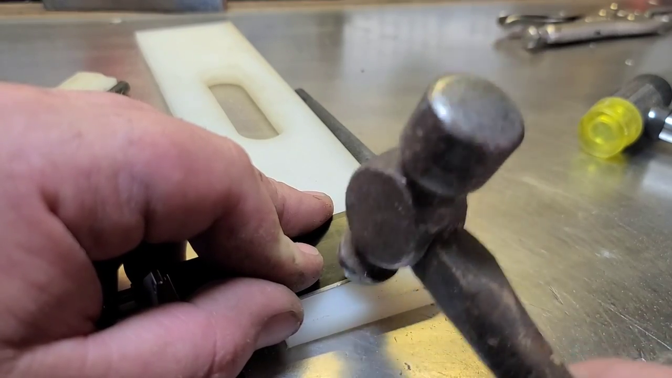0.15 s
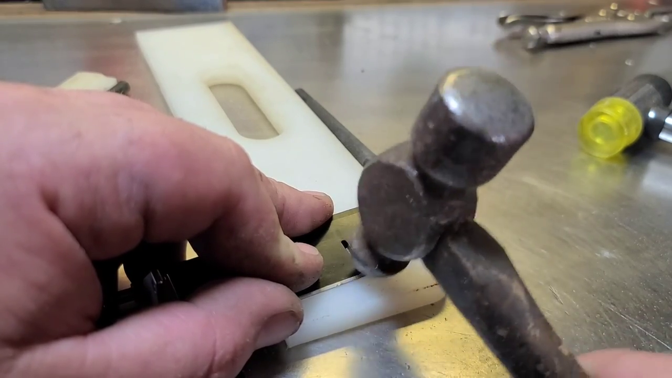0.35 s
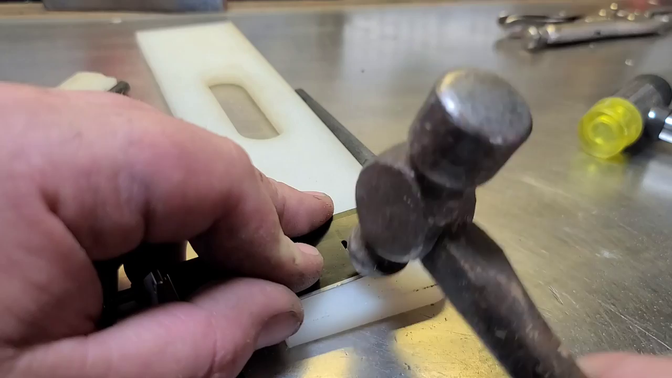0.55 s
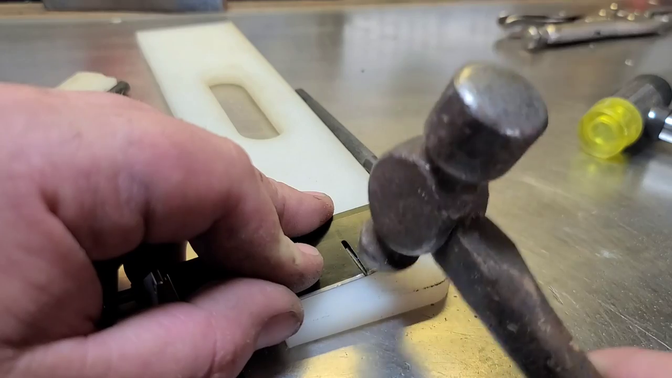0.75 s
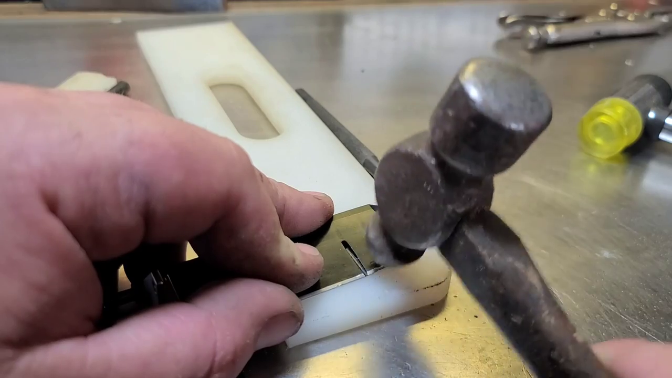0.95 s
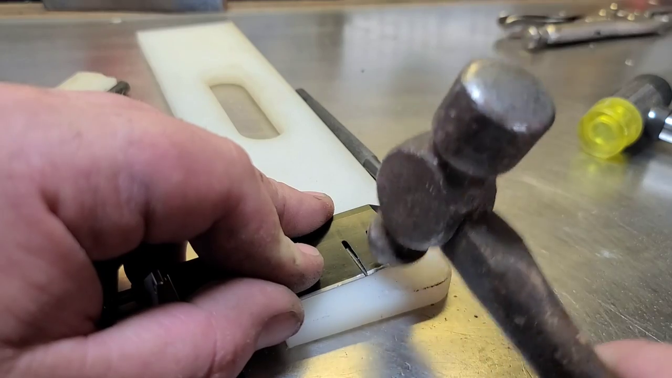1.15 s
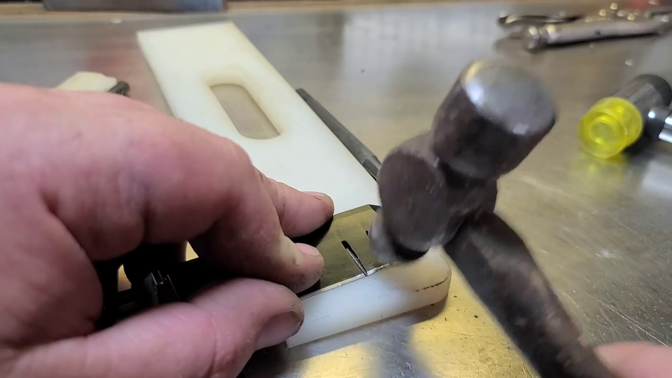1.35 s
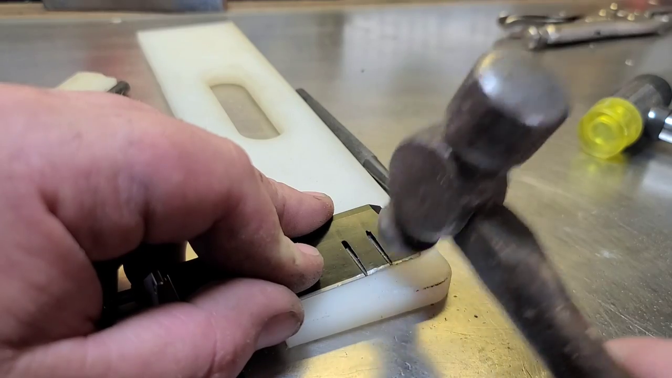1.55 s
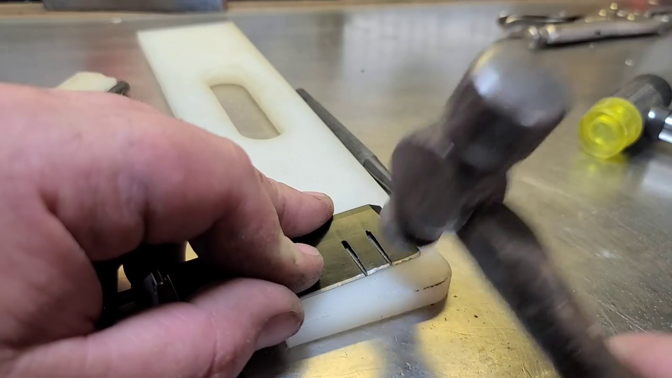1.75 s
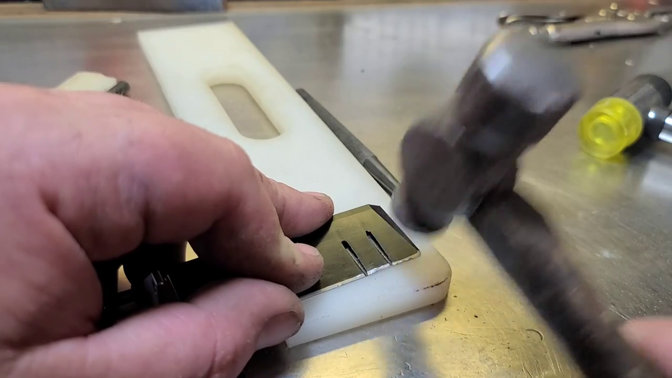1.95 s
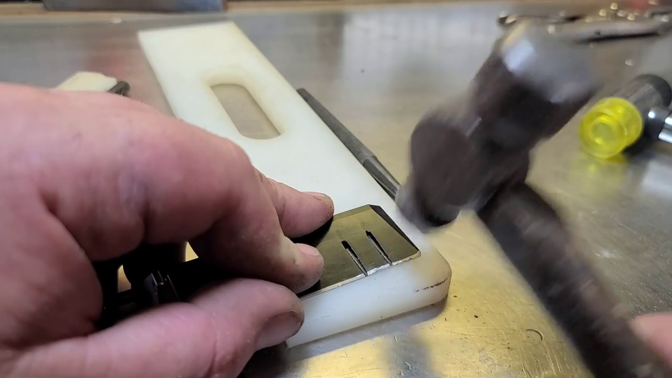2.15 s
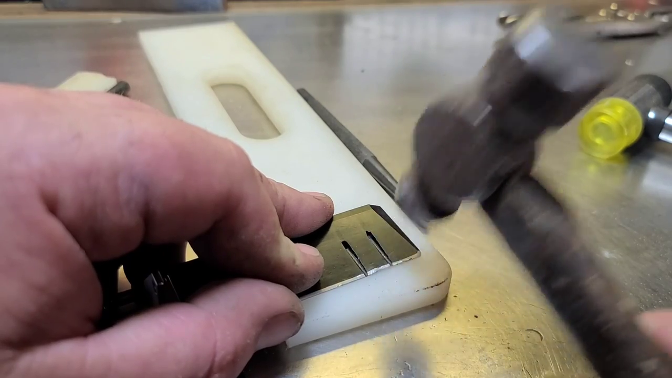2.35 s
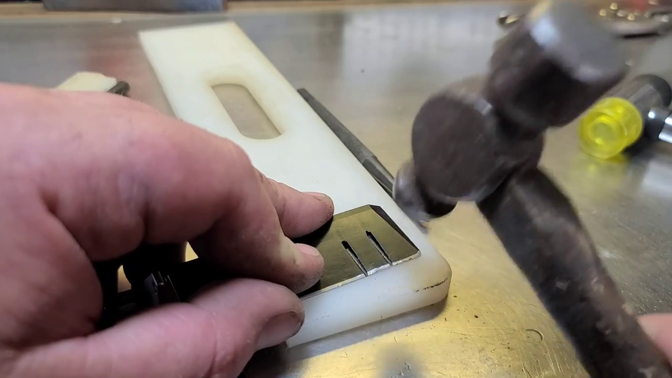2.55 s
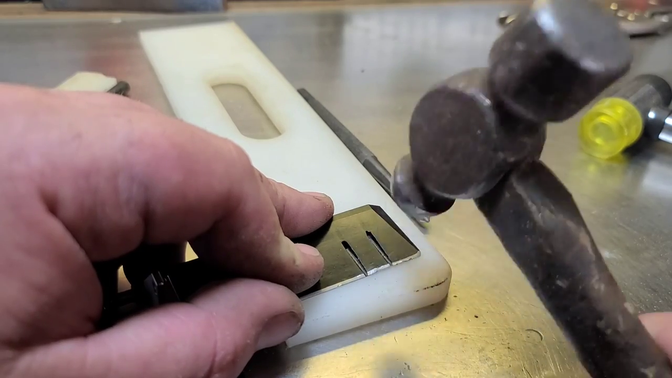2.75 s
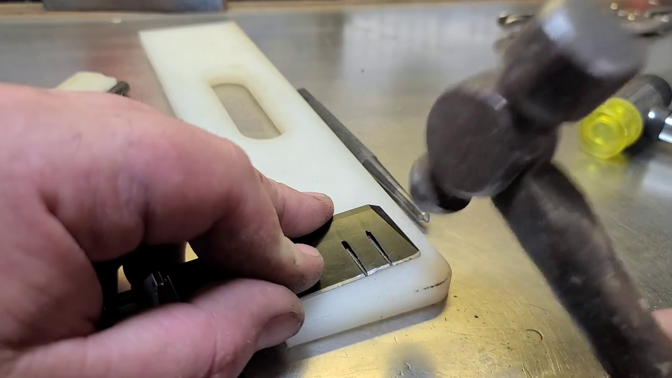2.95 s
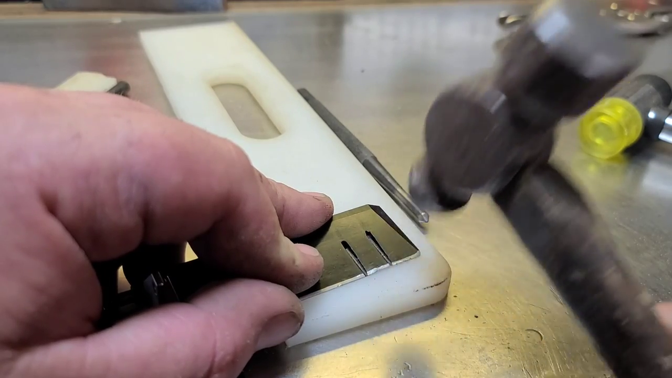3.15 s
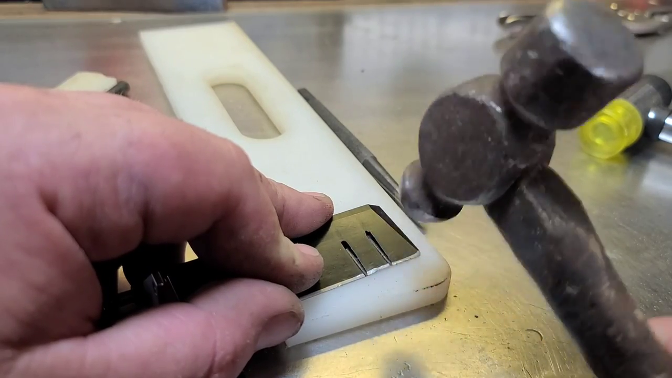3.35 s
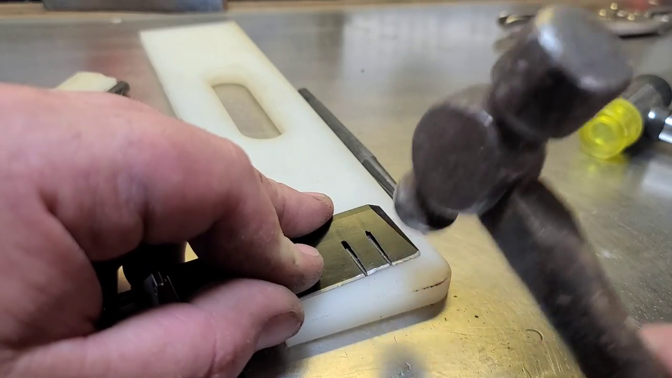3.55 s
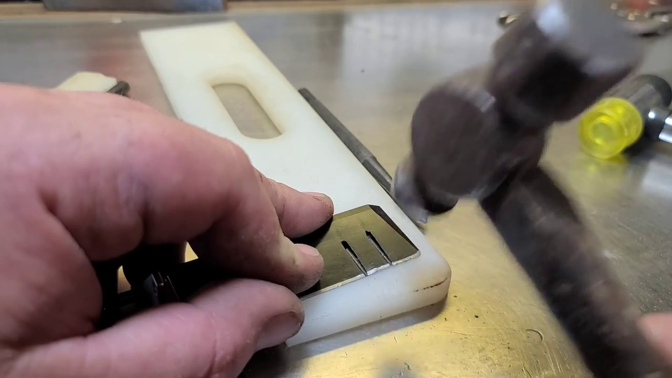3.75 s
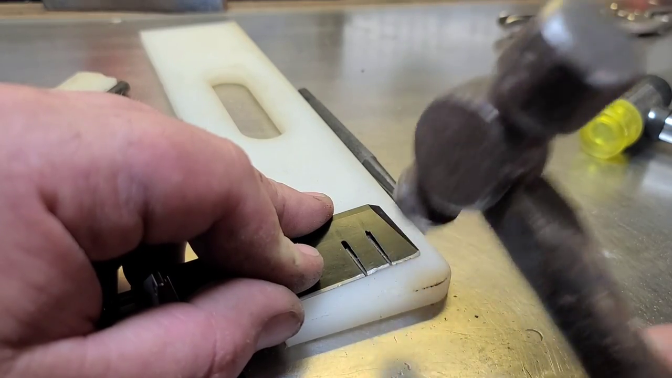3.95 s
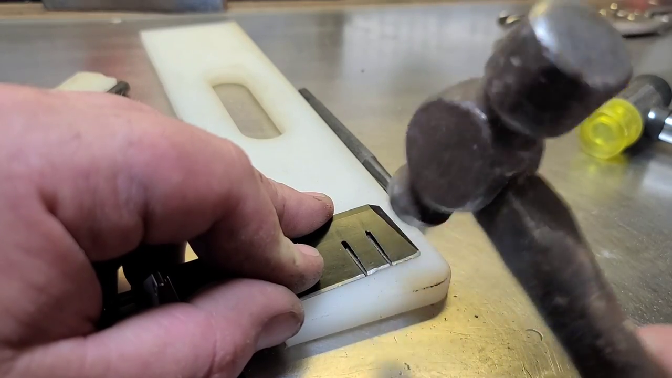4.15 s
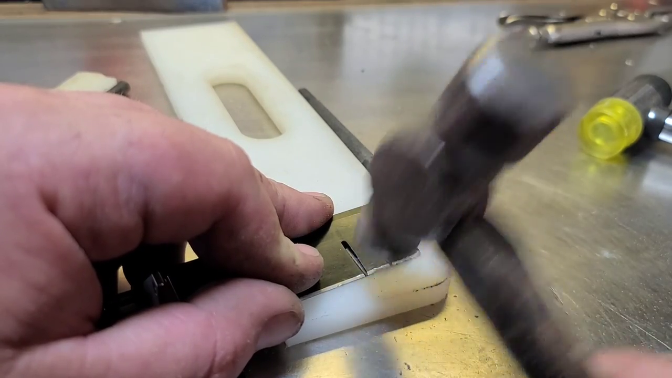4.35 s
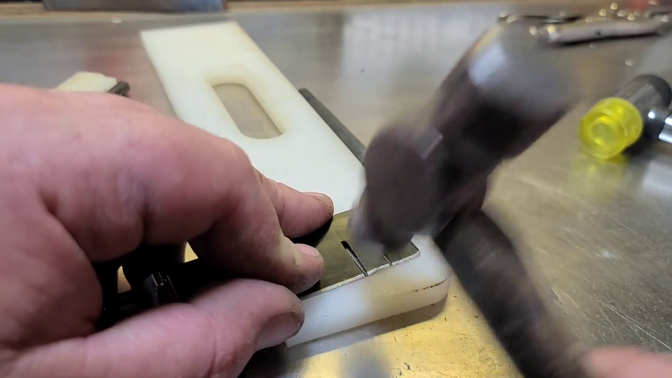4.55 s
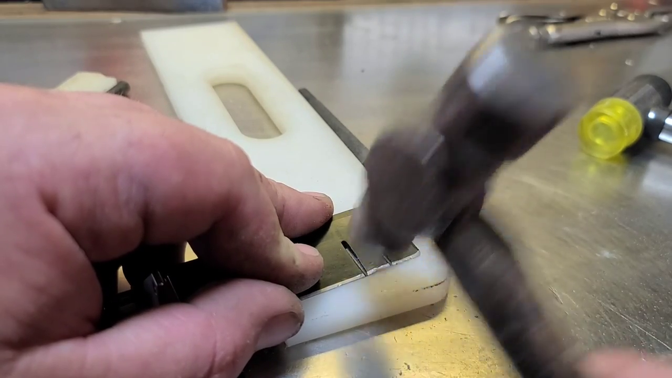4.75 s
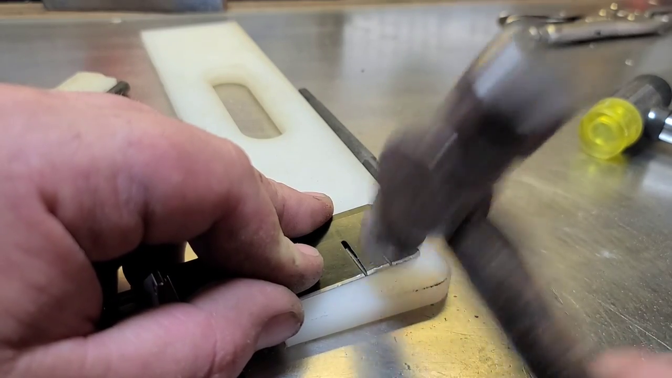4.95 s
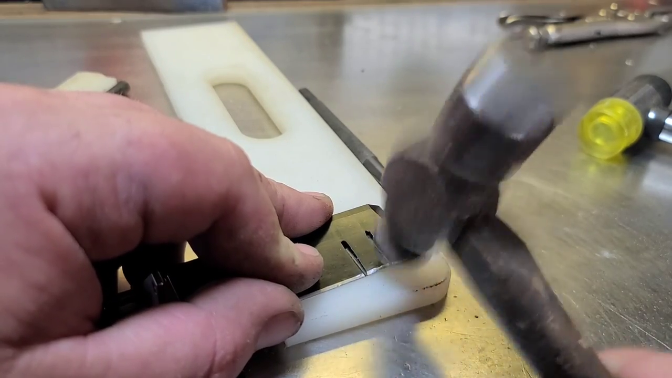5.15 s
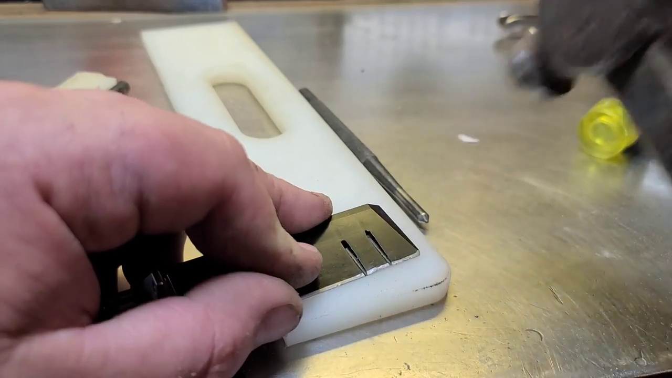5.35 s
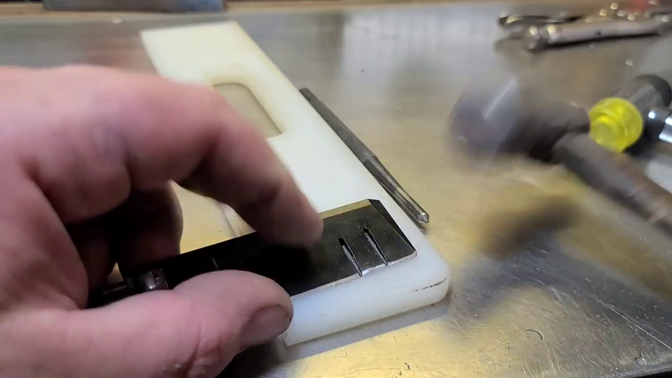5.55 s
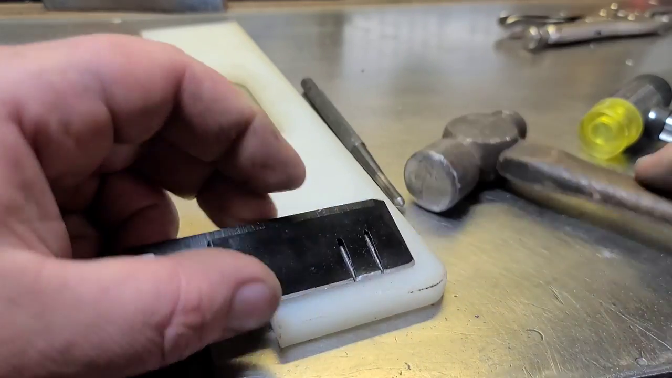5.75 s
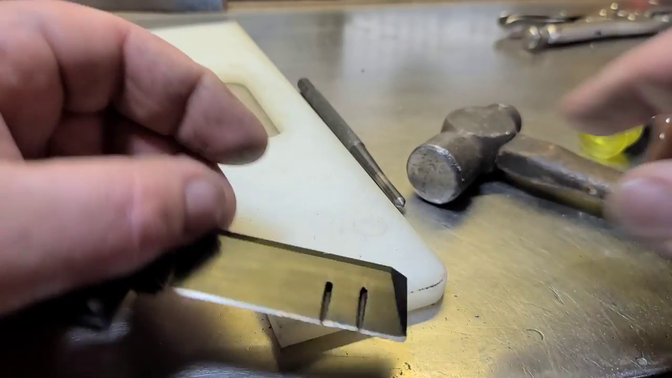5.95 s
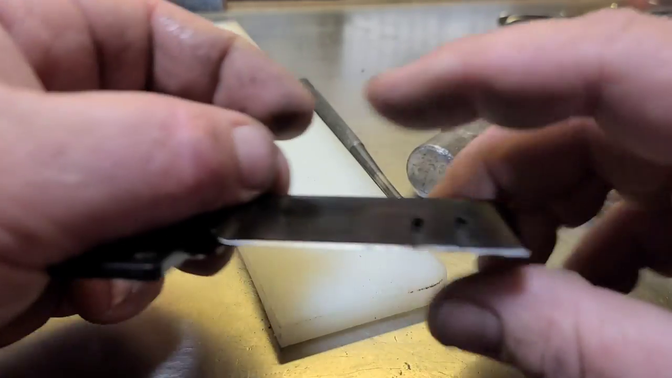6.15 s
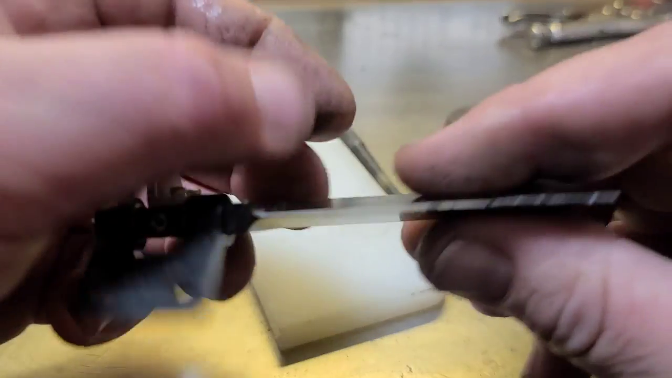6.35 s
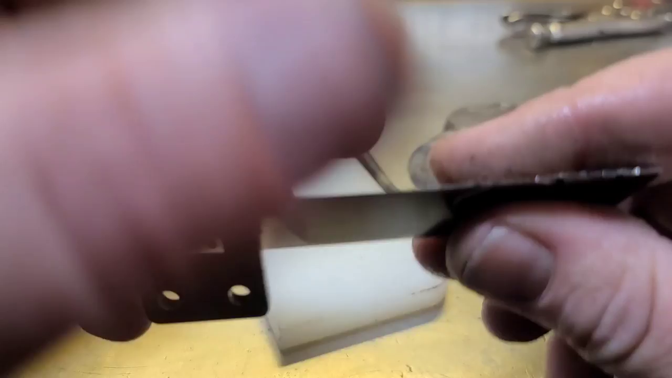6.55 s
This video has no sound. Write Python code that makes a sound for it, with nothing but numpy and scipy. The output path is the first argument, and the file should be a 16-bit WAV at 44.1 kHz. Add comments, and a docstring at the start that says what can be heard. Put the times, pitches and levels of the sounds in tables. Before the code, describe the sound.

From the very start, a small hammer taps a flat steel part held on a plastic cutting board, about five strikes a second, even in pace and strength. Each tap is a sharp metallic crack with a short buzz, while the board bounces on a metal-topped bench that thumps and rattles. The taps turn slightly duller around 3 to 4 seconds, brighten again, and stop at about 5.3 seconds. The part ticks faintly in the fingers at 5.5 seconds. Between 5.7 and 5.8 seconds the hammer head meets the bench with three quick clanks and a thin, brief ring, and the handle drops with a rocking knock just before 6 seconds. At 6.5 seconds the lifted part gives a light click. The microphone is close, in a small workshop with short reverberation, a quiet low rumble and a faint hiss that swells at the end.

```python
"""Hammer taps, about five a second, on a flat steel part held on a plastic cutting board.
Each tap cracks and buzzes; the board bounces on a metal-topped bench, which thumps and rattles.
The part clicks in the fingers and the small hammer is laid down: its head clanks and rings, its handle
drops. The part clicks again as it is lifted. A close phone in a small workshop, over low rumble and
a faint hiss that swells at the end."""
import sys
import numpy as np
from scipy import signal
from scipy.fft import rfft, irfft
from scipy.io import wavfile
from scipy.ndimage import uniform_filter1d

SR = 44100
rng = np.random.default_rng(int(sys.argv[2]) if len(sys.argv) > 2 else 0)


def transcribe(signal):
    """Save signal, clipped to [-1, 1], as a 16-bit WAV file at the path in sys.argv[1]."""
    frames = np.atleast_2d(signal).T
    limited = np.clip(frames, -1, 1)
    pcm = np.round(limited * 32767).astype(np.int16)
    wavfile.write(sys.argv[1], SR, pcm)


N = 290619
FFT_SIZE = 32768
TIME_S, FREQ_HZ = np.arange(FFT_SIZE) / SR, np.arange(FFT_SIZE // 2 + 1) * SR / FFT_SIZE

# hammer taps: (time [s], strength [dB], treble tick as the hammer's rim catches the part [dB])
TAPS = [(-0.003, -2.5, -1), (0.197, -0.8, 3), (0.4034, -0.3, 0.5), (0.5951, -0.7, 0), (0.7906, -0.8, 2.5),
        (0.991, -1.5, 3), (1.1869, -0.7, 1.5), (1.381, -1.4, 3), (1.5764, -1.9, 1.5), (1.7659, -1.8, 1.5),
        (1.9599, -1, 1), (2.1582, -0.3, 0), (2.3495, -0.1, 1.5), (2.5458, -0.5, -0.5), (2.7329, -0.8, -1),
        (2.9245, -0.6, 1), (3.116, -0.5, -7), (3.3099, 0, 1), (3.5037, 0.05, 0), (3.6971, -1.1, 0),
        (3.897, -0.8, -0.5), (4.0993, -0.9, 2.5), (4.2913, -1.4, 3), (4.4783, -2.5, 3.5), (4.666, -0.4, 0),
        (4.8639, 0.15, -1), (5.0595, 0, -1), (5.2492, -0.5, 0)]
# board and bench modes: (frequency [Hz], peak [dB], t60 [s], left minus right [dB])
BENCH_MODES = [(71.5, 32.5, 0.42, -1.5), (87.8, 28, 0.29, 2), (133.6, 22.5, 0.098, 8), (143.4, 21, 0.14, 3),
               (210.1, 29.5, 0.32, 0.5), (241.2, 29, 0.082, -3), (300.6, 34.5, .13, -3),
               (324.3, 33, 0.057, -0.5), (382.8, 32, 0.053, -1), (440.3, 32, 0.072, 5),
               (460.2, 33, 0.13, 6), (529.3, 26.5, 0.09, -7.5), (576.4, 20, 0.052, -7), (605, 14, 0.1, 17),
               (690, 18, 0.19, 7), (747.6, 22.5, 0.11, 1), (779.5, 19, 0.12, -4), (924, 19.5, 0.074, -17.5),
               (971.5, 20, 0.049, 7), (1057, 18.5, 0.025, -14), (1184, 20.5, 0.055, -9),
               (1224, 7.5, 0.069, -23), (1547.5, 20.5, 0.08, -12)]
# board slapping the bench: (frequency [Hz], peak [dB], t60 [s], left minus right [dB])
SLAP_MODES = [(325, 18, 0.011, 1), (686, 12, 0.0063, -2)]
# hand-damped steel part: (frequency [Hz], peak [dB], t60 [s], left minus right [dB])
PART_MODES = [(2264, 18, 0.07, 9), (2711, 18, 0.043, -9.5), (2889, 20, 0.055, -5), (3287, 16, 0.05, -0.5),
              (3740, 17, 0.04, 4.5), (4015, 14, 0.04, -8), (4980, 18, 0.025, -3), (8030, 11, 0.035, -1.5),
              (8970, 13, 0.03, -3), (9210, 9, 0.02, 5.5)]
# steel on steel at each microphone: (frequency [Hz], left [dB], right [dB])
STEEL_EQ = [(302, 7, 15.5), (660, 9.5, 19.5), (1180, 20.5, -1.5), (1660, 2, 12.5), (2570, 9, 7),
            (2700, 10.5, 17), (4200, -5, 14.5), (4664, 18.5, 16), (5510, 10.5, -6), (7100, 9.5, 9.5),
            (8100, -7, 15), (9510, 15, 11.5), (13700, 11, 8), (15500, 7, -15)]
# bench top's dense upper modes and loose things on it: (frequency [Hz], level [dB])
RATTLE_EQ = [(200, 2.5), (500, 16), (1100, 20), (1800, 13.5), (3000, 16), (4500, 8.5), (8000, 4.5),
             (15000, 0.5)]
# seating of the part: (time [s], firmness [0 usual, below: hollow bright clack, above: dull knock])
FIRMNESS = [(0.2, -0.61), (1.4, 0.42), (1.96, 1.3), (2.73, 0.54), (2.93, 2.3), (3.12, 2.7), (3.31, 1.7),
            (3.7, 2.14), (4.48, 1), (4.66, -1.33), (5.25, 0.81)]
# tap colour at firmness 1: (frequency [Hz], gain [dB])
FIRM_EQ = [(350, 0.35), (1000, 1), (3500, -1.4), (11000, -0.45)]
# workshop reverberation: (frequency [Hz], level re direct sound [dB])
ROOM_EQ = [(60, 1), (300, -14.5), (1000, -16.5), (3000, -14), (6000, -12), (10000, -10.5), (15000, -25)]
# background noise: (frequency [Hz], relative density [dB])
BACKGROUND_EQ = [(15, -35), (25, -5), (59, 1), (178, -15), (340, -9), (631, -25), (919, -24), (1020, -29),
                 (2360, -30), (7700, -39), (10400, -33), (15500, -41)]
# part in the fingers: (time [s], level [dB], tilt [dB/octave], t60 [s])
CLICKS = [(5.4588, -27, -9, 0.012), (6.5458, -14, -2.5, 0.029)]
# click spectrum: (frequency [Hz], level [dB])
CLICK_EQ = [(300, -29), (1500, -31.5), (2500, 3), (6000, 11), (9500, 14.5), (15500, 5.5)]
# head on the bench: (time [s], level [dB], tilt [dB/octave], t60 [s], head ring [dB])
CLANKS = [(5.685, 21, 0.5, 0.042, -40), (5.7670, 11, 1, 0.085, -30.5), (5.8328, 19.5, 0.5, 0.035, -38)]
# clank spectrum: (frequency [Hz], level [dB])
CLANK_EQ = [(80, -8.5), (200, -11), (400, -1.5), (700, -9), (1100, -3.5), (2000, -5.5), (3000, 1.5),
            (5500, -8.5), (9000, -15.5), (15000, -24)]
# handle on the bench: (time [s], level [dB], tilt [dB/octave], t60 [s])
KNOCKS = [(5.9415, 12.5, 0.5, 0.11), (5.9592, 13, 5, 0.015), (5.9790, 2, -1.5, 0.091)]
# knock spectrum: (frequency [Hz], level [dB])
KNOCK_EQ = [(60, -3), (180, 0.5), (300, 0.5), (400, 9.5), (650, -8), (1050, 1.5), (1600, -5.5), (2700, -5),
            (5500, -18), (9000, -31.5), (15000, -41)]


def undb(db):
    """Decibels to gain."""
    return 10 ** (np.asarray(db) / 20)


def curve_db(points, freq_hz=FREQ_HZ):
    """(frequency [Hz], level [dB]) points joined on a log-frequency axis."""
    hz, db = np.transpose(points)
    return np.interp(np.log(freq_hz + 1), np.log(hz), db)


def causal(db):
    """Minimum-phase response: rings only after the blow."""
    cepstrum = irfft(db * np.log(10) / 20)
    cepstrum[1:FFT_SIZE // 2] *= 2
    cepstrum[FFT_SIZE // 2 + 1:] = 0
    return np.exp(rfft(cepstrum))


def delay(lag_s):
    """Frequency response of a delay."""
    return np.exp(-2j * np.pi * FREQ_HZ * lag_s)


def stereo_noise(size, apart_hz=800):
    """Noise at two close microphones: alike in the bass, unrelated in the treble."""
    mid, side = rfft(rng.standard_normal((2, size)))
    hz = np.arange(len(mid)) * SR / size
    spread_rad = np.pi / 4 * hz / np.hypot(hz, apart_hz)
    return irfft(mid * np.cos(spread_rad) + np.array([[1], [-1]]) * side * np.sin(spread_rad), size)


def burst(t60_s):
    """Spectrum of countless modes struck together: fading noise, flattened across frequency."""
    spectrum = rfft(stereo_noise(FFT_SIZE) * np.exp(-np.log(1000) * TIME_S / t60_s))
    span_bins = int(np.clip(30 / t60_s / FREQ_HZ[1], 8, 4000))
    return spectrum / np.sqrt(uniform_filter1d(np.abs(spectrum) ** 2, span_bins, axis=1))


def modes(table, right_lag_s=0.00017):
    """Stereo spectra of damped modes; neighbours swing in opposite directions."""
    spectra = []
    for k, (hz, db, t60_s, pan_db) in enumerate(table):
        decay_per_s = np.log(1000) / t60_s
        envelope = 2 * decay_per_s / SR * np.exp(-decay_per_s * TIME_S)
        ring = -(-1) ** k * envelope * np.sin(2 * np.pi * hz * TIME_S)
        spectra.append(undb(db + np.array([[pan_db], [-pan_db]]) / 2) * rfft(ring))
    return np.array(spectra) * np.array([delay(0), delay(right_lag_s)])


def add(out, at_s, spectrum):
    """Mix the first half second of a sound into out."""
    onset = int(round(at_s * SR))
    start, end = max(onset, 0), min(onset + SR // 2, N)
    out[:, start:end] += irfft(spectrum, FFT_SIZE)[:, start - onset:end - onset]


def hammer_taps(bounce_s=0.00525, rebound=0.37, reslap=0.9, echo_s=0.0212, echo_db=-9,
                edge_db=-15, crack_db=-7, seat_s=0.001101, seat_db=-4, buzz_s=0.0039, buzz_db=-6,
                rattle_db=-1, alike=0.67, spot_db=4, press_s=0.0004, tick_hz=7000):
    """The hammer cracks on the part and seats it; the part buzzes; the board bounces on the bench."""
    out = np.zeros((2, N))
    soften = 1 / np.sqrt(1 + (FREQ_HZ / 1500) ** 2)
    wall_echo = undb(echo_db) * soften * delay(echo_s)
    thump = modes(BENCH_MODES).sum(axis=0) * (1 + wall_echo)
    slap = sum(modes([mode])[0] for mode in SLAP_MODES)
    part_modes = modes(PART_MODES)
    steel_eq = np.array([causal(curve_db(np.array(STEEL_EQ)[:, [0, side]])) for side in (1, 2)])
    rattle_eq = causal(curve_db(RATTLE_EQ))
    t60s_s = (0.005, 0.007, 0.022, 0.12)  # crack, seat, buzz, loose things
    shared_bursts = [burst(t60_s) for t60_s in t60s_s]
    for at_s, strength_db, tick_db in TAPS:
        bounce_jitter, seat_jitter = rng.standard_normal(2)
        # nearly the same spot each time: only some of the fine ringing changes
        crack, seat, buzz, loose = (alike * shared + np.sqrt(1 - alike ** 2) * burst(t60_s)
                                    for shared, t60_s in zip(shared_bursts, t60s_s))
        mode_gains = undb(spot_db * rng.standard_normal(len(PART_MODES)))
        clink = np.tensordot(mode_gains, part_modes, 1)
        contact = (-undb(edge_db) + undb(crack_db) * crack
                   + undb(seat_db) * seat * delay(seat_s * (1 + 0.089 * seat_jitter))
                   + undb(buzz_db) * buzz * delay(buzz_s))
        tick_eq = causal(tick_db * FREQ_HZ ** 6 / (FREQ_HZ ** 6 + tick_hz ** 6))
        steel = (steel_eq * contact * tick_eq + clink) * delay(press_s)
        bounce = delay(bounce_s * (1 + 0.016 * bounce_jitter))
        landing = rebound * soften * bounce  # each weaker and duller than the last
        force = 1 + landing + 0.68 * landing ** 2 + 0.5 * landing ** 3
        board = thump * force + slap * (1 + reslap * bounce)
        rattle = undb(rattle_db) * rattle_eq * loose * bounce
        firmness = np.interp(at_s, *np.transpose(FIRMNESS))
        tap_eq = causal(strength_db + firmness * curve_db(FIRM_EQ))
        add(out, at_s, (board + steel + rattle) * tap_eq)
    return out


def workshop_reverb(direct, low_t60_s=0.34, high_t60_s=0.19, split_hz=2500, predelay_s=0.0053):
    """Short, dense reflections; the treble dies first."""
    low = 1 / np.sqrt(1 + (FREQ_HZ / split_hz) ** 4)
    tail = low * burst(low_t60_s) + np.sqrt(1 - low ** 2) * burst(high_t60_s)
    response = irfft(tail * causal(curve_db(ROOM_EQ)) * delay(predelay_s))
    return signal.fftconvolve(direct, response[:, :FFT_SIZE * 3 // 4], axes=1)[:, :N]


def background(base_db=-54, split_hz=600, hiss_db=-3, swell_start_s=6.17, swell_db_per_s=22):
    """Low room rumble and a faint hiss that swells at the end."""
    hz = np.arange(N // 2 + 1) * SR / N
    air = rfft(stereo_noise(N)) * undb(curve_db(BACKGROUND_EQ, hz))
    air *= undb(base_db) / np.std(irfft(air, N))
    high = hz ** 2 / (hz ** 2 + split_hz ** 2)
    rumble, hiss = irfft(air * (1 - high), N), irfft(air * high, N)
    swell_db = swell_db_per_s * np.maximum(np.arange(N) / SR - swell_start_s, 0)
    return rumble + undb(hiss_db + swell_db) * hiss


def contacts(events, eq, edge_db, ring_db, ring_t60_s):
    """Single contacts: sharp edge, short clatter, after-ring."""
    out = np.zeros((2, N))
    octaves = np.log2(np.maximum(FREQ_HZ, 200) / 2000)
    for at_s, db, tilt_db_per_octave, t60_s, *_ in events:
        colour = causal(db + curve_db(eq) + tilt_db_per_octave * octaves)
        strike = undb(edge_db) + burst(t60_s) + undb(ring_db) * burst(ring_t60_s)
        add(out, at_s, colour * strike)
    return out


def part_clicks():
    """The steel part clicks lightly in the fingers."""
    return contacts(CLICKS, CLICK_EQ, edge_db=-13, ring_db=-32.5, ring_t60_s=0.084)


def head_clanks():
    """The hammer head meets the metal bench top."""
    return contacts(CLANKS, CLANK_EQ, edge_db=-13, ring_db=-3, ring_t60_s=0.2)


def head_ring(mode_hz=10686, waver_hz=14, free_t60_s=0.8, settle_s=5.803, bench_t60_s=0.13, pan_db=7):
    """One head mode, restruck at each clank; wavers with the rocking; once flat, the bench damps it."""
    time_s = np.arange(N) / SR
    level_db = np.full(N, -np.inf)
    for at_s, *_, ring_db in CLANKS:
        settled_s = np.maximum(time_s - max(at_s, settle_s), 0)
        fall_db = 60 * ((time_s - at_s) / free_t60_s + settled_s / bench_t60_s)
        level_db = np.where(time_s >= at_s, ring_db - fall_db, level_db)
    waver = uniform_filter1d(rng.standard_normal(N), size=400)
    hz = mode_hz + waver_hz * waver / np.std(waver)
    tone = np.sqrt(2) * np.sin(2 * np.pi * np.cumsum(hz) / SR)
    return tone * undb(level_db + np.array([[pan_db], [-pan_db]]) / 2)


def handle_knocks():
    """The handle drops on the bench and rocks."""
    return contacts(KNOCKS, KNOCK_EQ, edge_db=-24, ring_db=2, ring_t60_s=0.11)


def scene():
    """Tapping, hammer laid down, part lifted, all in the workshop."""
    handling = head_clanks() + handle_knocks() + part_clicks()
    direct = hammer_taps() + head_ring() + handling
    return direct + workshop_reverb(direct) + background()


def record(dry, low_cut_hz=57, ceiling_db=4.5, high_cut_hz=15900):
    """The phone drops the deepest bass, rounds the loudest peaks and cuts the top."""
    highpass = signal.butter(2, low_cut_hz, "high", fs=SR, output="sos")
    lowpass = signal.ellip(8, 0.1, 60, high_cut_hz, fs=SR, output="sos")
    ceiling = undb(ceiling_db)
    rounded = ceiling * np.tanh(signal.sosfilt(highpass, dry) / ceiling)
    return signal.sosfiltfilt(lowpass, rounded)


dry = scene()
out = record(dry)
transcribe(out)
```